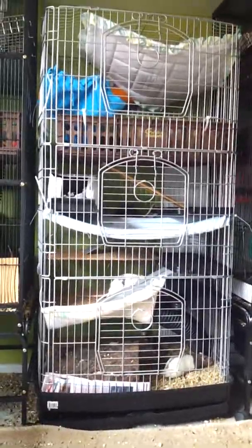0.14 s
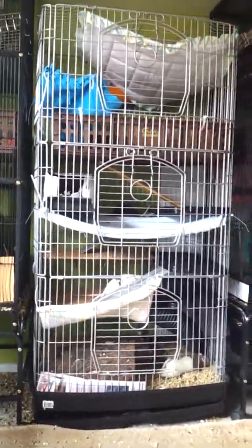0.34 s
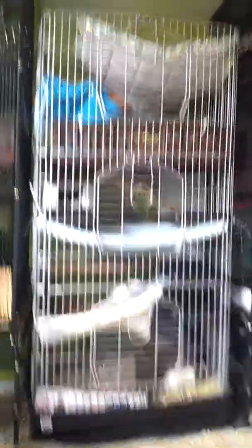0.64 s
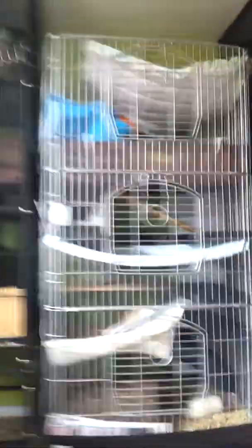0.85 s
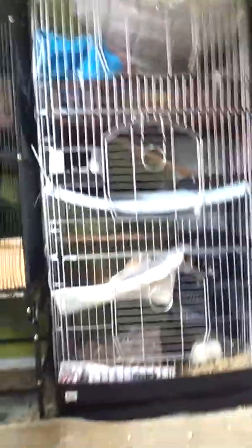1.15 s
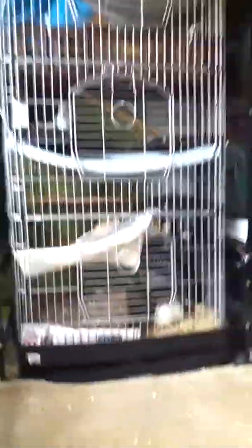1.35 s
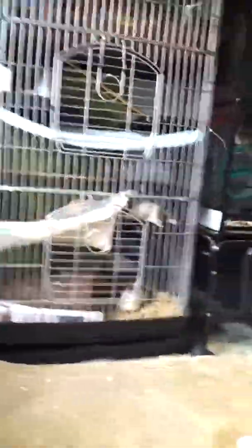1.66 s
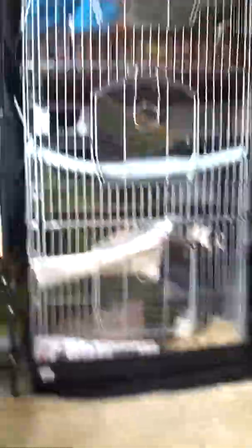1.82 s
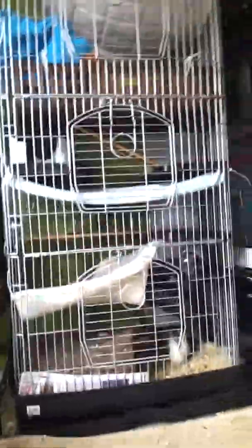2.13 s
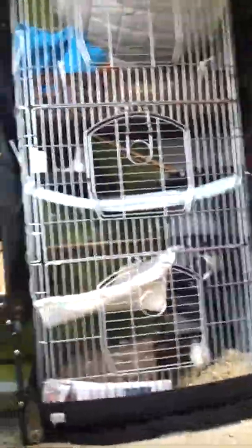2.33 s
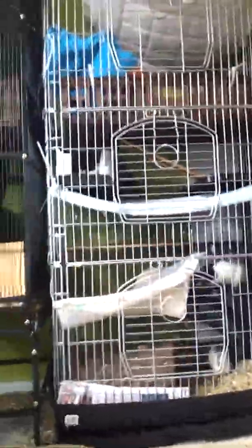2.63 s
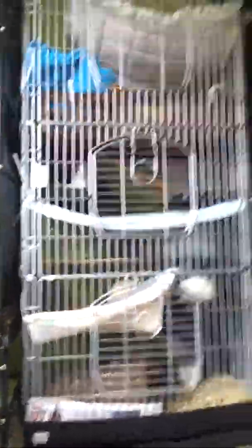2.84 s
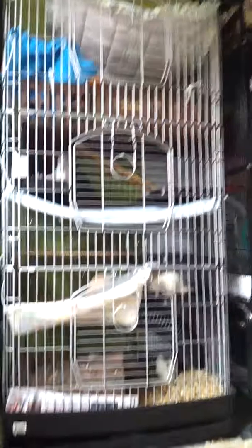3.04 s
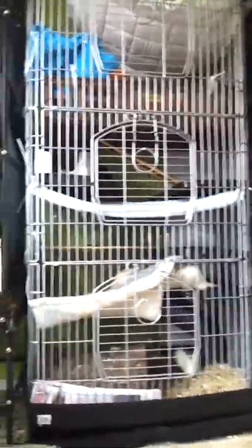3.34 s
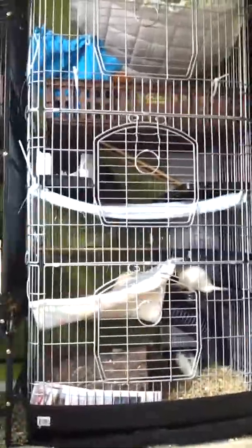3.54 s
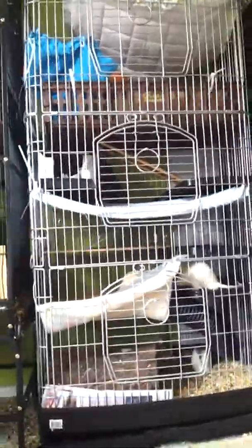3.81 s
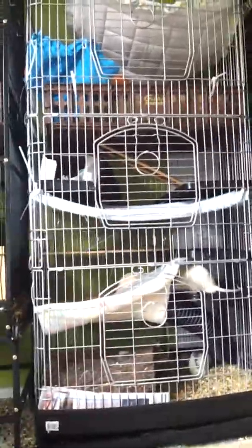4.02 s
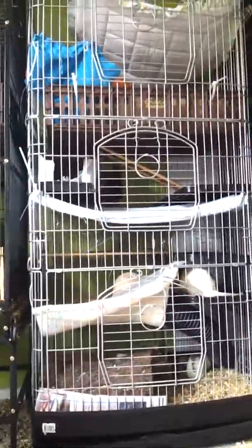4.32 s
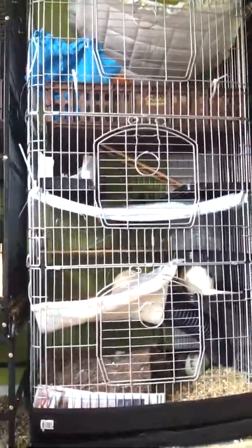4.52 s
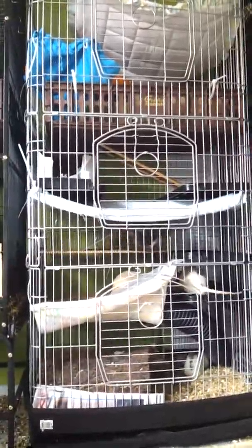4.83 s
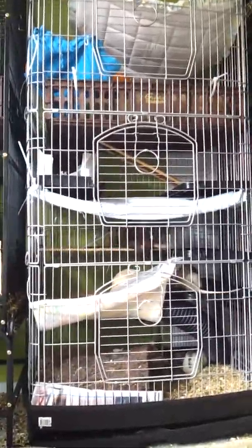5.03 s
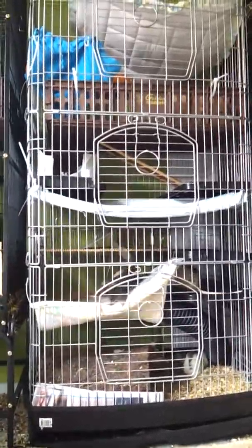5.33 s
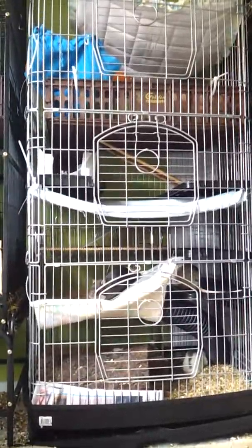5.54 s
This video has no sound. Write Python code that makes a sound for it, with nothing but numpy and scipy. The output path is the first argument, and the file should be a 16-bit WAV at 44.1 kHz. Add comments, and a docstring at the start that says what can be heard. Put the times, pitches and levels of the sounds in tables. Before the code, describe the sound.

Rats move about in a wire cage in a small quiet room. Faint, crackly rustling of bedding and cloth comes first, with scattered claw ticks and a few soft knocks on the tray. The shuffling grows busier, with low bumps and a quick run of sharp clicks. Near the end, louder jolts rattle the lightly ringing bars. The sound leans left, where it is brighter, over a faint rumble and hiss.

```python
"""Rats in a wire cage

Rats climb the bars and shuffle through bedding and cloth in a small quiet room. Countless tiny slips
make a dense crackle in four parts: claws, wires, tray and cloth. Shuffles swell and fade, jolts shake
all parts at once, and scrapes, thumps, dry ticks and soft knocks stand out. Two microphones far apart
hear it, the left one bright, the right one dull."""
import sys
import numpy as np
from scipy import signal
from scipy.fft import rfft, irfft
from scipy.io import wavfile

SR = 44100
rng = np.random.default_rng(int(sys.argv[2]) if len(sys.argv) > 2 else 0)


def dump_mix(stems):
    """Bounce the given channels to the path in sys.argv[1] as a 16-bit WAV at rate SR."""
    frames = np.atleast_2d(stems).T  # one column per channel
    limited = np.clip(frames, -1, 1)  # hard clip at full scale
    pcm = np.round(limited * 32767).astype(np.int16)
    wavfile.write(sys.argv[1], SR, pcm)


N = 250047


def from_db(db):
    return 10 ** (np.asarray(db) / 20)


def unit_rms(x):
    return x / np.sqrt(np.mean(x ** 2, axis=-1, keepdims=True) + 1e-20)


def colour(x, spectrum):
    """Minimum-phase EQ from rows of (Hz, dB), so that nothing sounds early."""
    size = 4096
    hz, db = np.transpose(spectrum)
    grid = np.maximum(np.arange(size // 2 + 1), .5) * SR / size
    cepstrum = irfft(np.interp(np.log(grid), np.log(hz), db) * np.log(10) / 20)
    cepstrum[1:size // 2] *= 2
    cepstrum[size // 2 + 1:] = 0
    impulse_response = irfft(np.exp(rfft(cepstrum)))
    return signal.fftconvolve(x, np.atleast_2d(impulse_response), axes=-1)[:, :N]


def pan_gains(db, pan_db):
    """Left and right gains for a level and a pan. Pan is left minus right in dB: positive leans left."""
    return 2 * from_db(db) / np.sqrt(1 + from_db(2 * np.multiply.outer([-1, 1], pan_db)))


def drift(rate_hz):
    """A smooth random wobble with an RMS of 1."""
    r = np.exp(-2 * np.pi * rate_hz / SR)
    return unit_rms(signal.lfilter([1], [1, -2 * r, r * r], rng.standard_normal(N + SR))[SR:])


# The colour of the quiet room. Each row: frequency in Hz, relative level in dB.
ROOM_SPECTRUM = [(25, 22.5), (60, 1), (150, 11), (400, 9), (1000, -2.5), (3000, -15), (6000, -6.5),
                 (14000, -5.5)]


def room_tone(level_db=-52.5):
    """A steady bed of low rumble and faint hiss."""
    return from_db(level_db) * unit_rms(colour(rng.standard_normal((2, N)), ROOM_SPECTRUM))


# Soft knocks on the tray. Each row: start in seconds, level in dB, pan in dB, pitch in Hz.
TRAY_KNOCKS = [(0.87, -30.5, 21, 300), (1.068, -31, 16, 380), (1.093, -33.5, 12, 400),
               (1.164, -36, 13, 450), (1.505, -37.5, 12, 300), (2.654, -36, 16, 250)]


def knocks():
    """A padded push on the tray: about two audible cycles of a low tone, the sides in opposite phase."""
    out, t = np.zeros((2, N)), np.arange(900) / SR
    for start, db, pan_db, hz in TRAY_KNOCKS:
        at = round(start * SR)
        push = np.sin(2 * np.pi * hz * t) * from_db(-60 * t * hz / 4.4)
        out[:, at:at + len(t)] += push * pan_gains(db, pan_db)[:, None] * [[1], [-1]]
    return out


# Short bands of noise: squeaky scrapes, low thumps and brief pings. Each row: start in seconds,
# nominal length in seconds, centre in Hz, nominal width in Hz, level in dB, pan in dB.
NOISE_BANDS = [(1.061, 0.0037, 5040, 1500, -37.5, -10), (1.062, 0.004, 8100, 1200, -38.5, -4),
               (1.35, 0.13, 4650, 1200, -56.5, -5), (1.745, 0.069, 236.5, 200, -49, 19),
               (1.94, .11, 240.4, 168, -38.5, 24), (1.943, .09, 451.7, 350, -39.5, 20),
               (2.061, 0.051, 302, 250, -46, 13), (1.997, .03, 125, 80, -53, 32),
               (2.388, 0.06, 4890, 1300, -44, -7), (2.641, .078, 144.5, 99, -51, 15),
               (2.66, 0.05, 793, 400, -49, -7), (2.81, 0.04, 1793, 1500, -48, 12),
               (2.904, 0.1, 4870, 900, -50, -17), (4.254, 0.045, 1457, 490, -27.5, 6),
               (4.291, 0.062, 496.3, 294, -33, 10), (4.307, 0.026, 3435, 700, -32, 2),
               (4.444, 0.041, 4200, 1600, -39.5, -3), (4.119, 0.031, 330, 200, -52, 5),
               (4.453, 0.024, 298, 150, -49.5, 1), (4.49, 0.022, 9260, 500, -36, 16),
               (4.55, 0.033, 689, 290, -31, -2), (4.553, 0.045, 1720, 300, -29.5, -3),
               (4.64, 0.034, 1568, 500, -28.5, 1), (4.697, 0.078, 8700, 1600, -31, 14),
               (4.729, 0.06, 660, 150, -39.5, -7), (5.325, 0.12, 8690, 900, -43, 18),
               (5.35, 0.12, 3660, 500, -47, -3), (5.387, 0.14, 1724, 200, -46.5, 1)]


def scrapes_thumps_pings():
    """Each is a short band of noise with a quick swell and a slower fall."""
    out = np.zeros((2, N))
    for start, length_s, hz, width_hz, db, pan_db in NOISE_BANDS:
        t = np.arange(round(min(1.28 * length_s, .2) * SR)) / SR
        noise = rng.standard_normal((2, 2, SR // 4))
        r = np.exp(-np.pi * width_hz / SR)
        flutter = unit_rms(signal.lfilter([1], [1, -2 * r, r * r], noise)[..., 2000:2000 + len(t)])
        band = flutter[0] * np.cos(2 * np.pi * hz * t) + flutter[1] * np.sin(2 * np.pi * hz * t)
        swell = np.sin(np.pi * np.sqrt(t / t[-1])) ** 1.07
        at = round(start * SR)
        out[:, at:at + len(t)] += band * swell * pan_gains(db, pan_db)[:, None]
    low_cut = signal.butter(4, 110, "high", fs=SR, output="sos")   # small bodies radiate no deep bass
    return signal.sosfilt(low_cut, out)


# The colours of claws (bright ticks, and the scratch in the rustle) and of dull ticks.
# Each row: frequency in Hz, gain in dB.
CLAW_SPECTRUM = [(3000, -52), (6000, -3), (8000, 2), (11000, 4), (14500, -4.5)]
DULL_TICK_SPECTRUM = [(150, -24), (700, -1), (2200, 3.5), (4500, -4), (6500, -6.5), (9000, -20)]
# Dry ticks. Each row: start in seconds, level before EQ in dB, base pan in dB, dullness from 0 to 1.
DRY_TICKS = [(0.8688, -12.5, -28, 0.08), (1.061, -24.5, -13, 0), (1.0912, -25, -11, 0.44),
             (1.351, -26.5, 9, 0.8), (1.9214, -23.5, 15.5, 0.8), (2.011, -24, 12, 0.6),
             (2.651, -24, 16, 0.2), (2.714, -27, 12, 0.2), (2.8173, -16.5, 20, 0.74), (3.2005, -12, 20, 0),
             (3.256, -15.5, 18, 1), (3.347, -19.5, 15, 0.05), (3.3832, -23, 16, 0), (3.4298, -31.5, 12, 1),
             (3.474, -28, 12, 0.3), (3.6122, -21.5, 14, 0.8), (3.624, -10.5, 31, 0.05),
             (3.653, -26, 11.0, 0.2), (3.6644, -19, 16, 0.9), (3.68, -24, 22, 0.87), (3.6824, -17, 16, 0.8),
             (3.6964, -10.5, 22.5, 0.5), (3.7039, 1.5, 33, 0.46), (3.7082, -23, 19.5, 0.4),
             (3.7145, -14.5, 24.5, 0.3), (3.7194, -22, 14.5, 0.4), (3.7422, -19, 18.5, 0.6),
             (3.7504, -20.5, 15, 0.3), (3.7577, -20.5, 15, 0.65), (3.854, -27, 13, 0.35),
             (4.0213, -30, 8.0, 0), (4.2326, -13, 10, 0.3), (4.256, -5, 2, 0), (4.3158, -7, 10, 0.3),
             (4.4367, -32, -17, 0.3), (4.6328, -6, 15, 0.18), (4.9821, -33, 10, 0.2), (5.025, -5, 14, 0.05),
             (5.1856, -29, 9.5, 0), (5.2318, 7.5, 26, 0), (5.5675, -20, 16, 0)]


def ticks():
    """Single impulses with a faint noisy tail of bounces; the bright share leans further left."""
    bright, dull = np.zeros((2, 2, N))
    t = np.arange(200) / SR
    for start, db, pan_db, dullness in DRY_TICKS:
        pulse = from_db(-25) * rng.standard_normal((2, len(t))) * from_db(-60 * t / .008)
        pulse[:, 0] = 1
        at = round((start + 0.00072) * SR)   # each click sounds 0.7 ms after its listed time
        bright[:, at:at + len(t)] += np.sqrt(1 - dullness) * pulse * pan_gains(db, pan_db + 9)[:, None]
        dull[:, at:at + len(t)] += np.sqrt(dullness) * pulse * pan_gains(db, pan_db)[:, None]
    return from_db(5) * colour(bright, CLAW_SPECTRUM) + from_db(8) * colour(dull, DULL_TICK_SPECTRUM)


def part_gains(claw_db, wire_db, tray_db, pan_db, cloth_offset_db=-3.5):
    """Stereo gains of claws, wires, tray and cloth, each placed its own way around the base pan."""
    claw_pan_db = 12.5 + 0.55 * pan_db + 0.38 * (claw_db + 19)   # further left when loud
    cloth_db = 0.96 * (tray_db + cloth_offset_db + 50) - 50   # follows the tray, swinging a little less
    return np.array([pan_gains(claw_db, claw_pan_db), pan_gains(wire_db, 0.47 * pan_db + 1.5),
                     pan_gains(tray_db, pan_db), pan_gains(cloth_db, pan_db + 4)])


# The fader curve of the stirring. Each row: time in seconds, claw level in dB, base pan in dB.
BEDDING_STIR = [(0, -53.5, -2), (.4, -59, -5.5), (1.0, -56.5, -4), (1.47, -53.5, 1), (1.56, -48.5, 1.5),
                (2.3, -52, 1), (3.0, -45, 9), (3.45, -50.5, 3), (4.1, -51, -0.5), (4.6, -44.5, 3),
                (4.95, -54, 2), (5.67, -55.5, -3)]


def stirring(below_claws_db=5.5):
    """Power of the four parts as the rats keep stirring in the bedding."""
    times, levels, pans = np.transpose(BEDDING_STIR)
    t = np.arange(N) / SR
    claw_db, pan_db = np.interp(t, times, levels), np.interp(t, times, pans)
    return part_gains(claw_db, claw_db - below_claws_db, claw_db - below_claws_db, pan_db) ** 2


# Shuffling moves. Each row: peak time, rise and fall in seconds, claw, wire and tray levels in dB,
# base pan in dB.
BODY_SHUFFLES = [(.10, 0.049, 0.084, -50, -52.5, -55.5, 0), (.17, .04, 0.044, -49, -55.5, -54.5, -1),
                 (.25, .04, 0.063, -50.5, -57.5, -57, -0.5), (.48, .05, 0.036, -57, -64, -74, 0),
                 (.685, 0.071, 0.042, -50.5, -59.5, -62, -3), (1.14, 0.098, 0.076, -52.5, -54.5, -53, 1.5),
                 (1.30, 0.1, 0.17, -48, -51.5, -54, -2.5), (1.41, 0.058, 0.037, -45.5, -63, -57, 1),
                 (1.715, 0.081, 0.21, -44, -45.5, -52, 27), (1.98, 0.13, 0.1, -43, -45.5, -44.5, 15),
                 (2.065, 0.051, 0.034, -44.5, -47.5, -48.5, -1),
                 (2.25, 0.039, 0.036, -41.5, -50.5, -53, -1), (2.43, 0.088, .06, -39, -50, -63, -3),
                 (2.56, .03, .03, -51, -50.5, -63, 1), (2.655, 0.058, 0.07, -38.5, -49, -49, 6),
                 (2.73, 0.086, 0.044, -51, -48, -53, 5), (2.79, 0.027, 0.043, -44, -55, -50, 10),
                 (2.90, 0.043, 0.053, -51, -43, -43, 28), (2.94, 0.073, 0.053, -32.5, -46.5, -46.5, 12),
                 (3.06, 0.079, 0.028, -42, -50, -48, 8), (3.19, 0.089, 0.073, -38, -44.5, -43.5, 6),
                 (3.254, 0.071, 0.077, -33.5, -41, -40.5, 7), (3.56, 0.024, 0.034, -48, -59, -53, 7),
                 (3.69, 0.074, 0.067, -41, -44, -44, 22), (4.05, 0.046, 0.095, -49.5, -52.5, -68, 10),
                 (4.23, 0.066, .03, -50, -44, -41.5, 3), (4.30, 0.056, 0.052, -23.5, -26, -30.5, -2),
                 (4.525, 0.035, 0.046, -32, -34, -37, 2), (4.70, .04, 0.036, -32, -43, -44, 3),
                 (4.747, 0.069, 0.059, -30, -35, -36.5, 2.5), (5.37, .07, 0.086, -37.5, -38.5, -45, 2),
                 (5.49, 0.071, 0.12, -50, -48.5, -52, 1)]


def shuffles(drop_db=12, roundness=1.23):
    """Power of moves that swell and fade, drop_db down at one rise or fall time from the peak."""
    power = np.zeros((4, 2, N))
    now = np.arange(N) / SR
    for peak_s, rise_s, fall_s, claw_db, wire_db, tray_db, pan_db in BODY_SHUFFLES:
        at = round(peak_s * SR)
        near = slice(max(at - SR // 2, 0), at + SR // 2)
        t = now[near] - peak_s
        from_peak = np.where(t < 0, -t / rise_s, t / fall_s)
        swell = from_db(-drop_db * from_peak ** roundness)   # roundness 1 is pointed, 2 is a bell
        gains = part_gains(claw_db, wire_db, tray_db, pan_db)
        power[..., near] += (gains[..., None] * swell) ** 2
    return power


# Sudden moves. Each row: start in seconds, claw, wire and tray levels in dB, base pan in dB,
# seconds to fade by 60 dB.
CAGE_JOLTS = [(.552, -50.5, -57, -59, -2, 0.34), (.919, -46.5, -57, -76, 0, .24),
              (1.09, -58, -57, -61, 0, .3), (1.352, -35.5, -42.5, -51, 0, .24),
              (1.518, -45.5, -54.5, -57, -8, 0.83), (1.922, -38, -48, -48, 18, 0.31),
              (2.111, -38.5, -48, -47.5, -1, 0.25), (2.222, -41.5, -46, -50, 2, 0.27),
              (2.377, -41, -39.5, -41.5, 2, 0.24), (3.891, -43.5, -44.5, -47.5, 6, 0.23),
              (3.933, -43, -44.5, -49, 11, 0.31), (4.109, -32, -37, -36.5, 2.5, 0.34),
              (4.254, -20, -19, -26, 9, 0.14), (4.313, -41, -21.5, -28, 11, 0.22),
              (4.436, -31, -26.5, -36, 4, 0.097), (4.491, -39, -35, -30, 4, 0.13),
              (4.512, -44, -40, -52, 15, .2), (4.547, -31.5, -26, -22.5, 2.5, 0.22),
              (4.633, -26, -22.5, -25, 1, .21), (4.739, -20, -45, -56, -1, 0.09),
              (4.898, -39, -49.5, -58, -2, 0.16), (4.999, -48, -49, -40, 0, 0.44),
              (5.023, -24, -26.5, -27, 2, .17), (5.217, -39.5, -49, -45.5, 9, 0.22),
              (5.23, -31, -36, -36.5, 3, 0.21), (5.375, -34.5, -33.5, -45.5, 3, 0.38),
              (5.565, -35, -42, -47, 3, 0.19)]


def jolts():
    """Power of jolts that shake all four parts at once and die away."""
    power = np.zeros((4, 2, N))
    attack_s = np.array([.0006, .001, .003, .008])[:, None, None]   # lower parts speak more slowly
    for start, claw_db, wire_db, tray_db, pan_db, t60 in CAGE_JOLTS:
        at = round(start * SR)
        t = np.arange(min(SR // 2, N - at)) / SR
        envelope = from_db(-60 * t / t60) * (1 - np.exp(-t / attack_s))
        gains = part_gains(claw_db, wire_db, tray_db, pan_db, cloth_offset_db=-8.5)
        power[..., at:at + len(t)] += (gains[..., None] * envelope) ** 2
    return power


def crackle(gain, spectrum, per_s, spread_db, clump_db, shared):
    """Tiny uneven slips that come in clumps; the shared part reaches the microphones in opposite phase."""
    sizes = from_db(spread_db * np.minimum(rng.exponential(1, (3, N)), 5)) * rng.standard_normal((3, N))
    grains = sizes * (rng.random((3, N)) < per_s / SR)
    slips = np.sqrt(shared) * grains[2] * [[1], [-1]] + np.sqrt(1 - shared) * grains[:2]
    slips *= from_db(clump_db * (drift(26) + drift(105)))
    return colour(gain * slips, spectrum) / colour(slips, spectrum).std(axis=1, keepdims=True)


# The resonances of wires and tray. Each row: frequency in Hz, width in Hz, gain in dB.
CAGE_MODES = [(420, 35, 7), (661.5, 13.7, 9.5), (1024, 13.3, -21), (1510, 12, 3), (1750, 17, -22),
              (2410, 33, -8), (3210, 7.6, -5), (3590, 20, -4), (3770, 25, -13), (4050, 15, 0),
              (8550, 32, -2), (9400, 22, 3), (10240, 26, -6.5), (11000, 33, -3)]


def cage_ring(drive, wander_db=2.5):
    """Wires and tray ring in narrow resonances; each wanders in strength, as when the animals move."""
    out = 0
    for k, (hz, width_hz, db) in enumerate(CAGE_MODES):
        r, angle = np.exp(-np.pi * width_hz / SR), 2 * np.pi * hz / SR
        zeros = (1 - r * r) / 2 * np.array([1, 0, -1])
        poles = [1, -2 * r * np.cos(angle), r * r]
        strength = from_db(db + wander_db * drift(12))
        out = out + (-1) ** k * signal.lfilter(zeros, poles, strength * drive)
    return out


# The colours of bright wires, hollow tray and muffled cloth. Each row: frequency in Hz, relative dB.
WIRE_SPECTRUM = [(1000, -30.5), (2300, -2.5), (3500, 1), (5500, -3.5), (7000, -9.5), (14000, -32)]
TRAY_SPECTRUM = [(200, -36.5), (550, -4.5), (1000, 1), (1700, -0.5), (2500, -7.5), (5000, -34)]
CLOTH_SPECTRUM = [(40, -46), (120, -19.5), (240, -3.5), (350, -1), (550, -3), (1200, -23.5)]


def rustle():
    """The rats' movement drives four layers of crackle; claws, wires and tray set the cage ringing."""
    claw_gain, wire_gain, tray_gain, cloth_gain = np.sqrt(stirring() + shuffles() + jolts())
    wires = crackle(wire_gain, WIRE_SPECTRUM, per_s=12000, spread_db=-0.5, clump_db=0.64, shared=0.016)
    tray = crackle(tray_gain, TRAY_SPECTRUM, per_s=6000, spread_db=1.5, clump_db=1.0, shared=0.12)
    claws = crackle(claw_gain, CLAW_SPECTRUM, per_s=9000, spread_db=-0.5, clump_db=0.6, shared=0.049)
    scrabble = wires + tray + from_db(-2) * claws
    ring = cage_ring(scrabble)
    cloth = crackle(cloth_gain, CLOTH_SPECTRUM, per_s=1500, spread_db=2.5, clump_db=0.5, shared=0.72)
    return scrabble + from_db(0.5) * ring + from_db(1) * cloth


def scene():
    """Room tone underneath; the rustle and its short accents on top."""
    return room_tone() + rustle() + scrapes_thumps_pings() + ticks() + knocks()


# The EQ of the bright left and dull right microphones. Each row: frequency in Hz, gain in dB.
LEFT_MIC_EQ = [(100, -4), (1500, 1.5), (4000, 0), (5500, -1.5), (6300, -4.5), (7000, -1.5), (8200, 1.5),
               (10500, 7.5), (12500, 2.5), (14500, 1)]
RIGHT_MIC_EQ = [(100, -4.5), (1500, 0), (3800, 1), (5000, 4.5), (5700, 3), (6100, -0.5), (8000, -1.5),
                (10500, -6.5), (12500, -2.5), (14500, -5.5)]


def record(dry, clip_level=.72, low_cut_hz=70, treble_edge_hz=14650, stopband_hz=16657):
    """Each microphone adds its colour; peaks clip, the bass thins and the top is cut steeply."""
    heard = np.vstack([colour(dry[:1], LEFT_MIC_EQ), colour(dry[1:], RIGHT_MIC_EQ)])
    heard = np.clip(heard, -clip_level, clip_level)
    heard = signal.sosfilt(signal.butter(2, low_cut_hz, "high", fs=SR, output="sos"), heard)
    heard = signal.sosfilt(signal.ellip(10, .5, 44, treble_edge_hz, fs=SR, output="sos"), heard)
    return signal.sosfilt(signal.cheby2(14, 70, stopband_hz, fs=SR, output="sos"), heard)


dry = scene()
out = record(dry)
dump_mix(out)
```